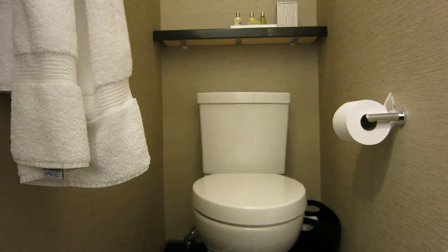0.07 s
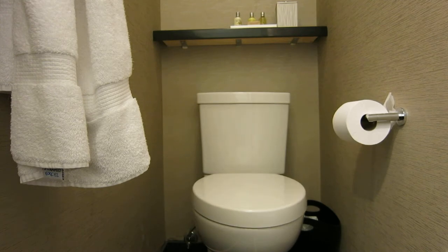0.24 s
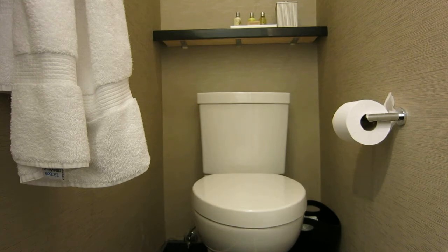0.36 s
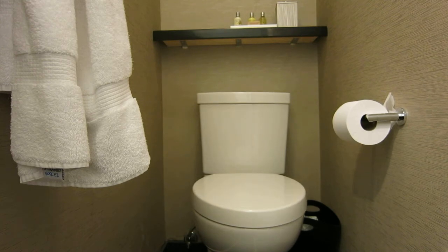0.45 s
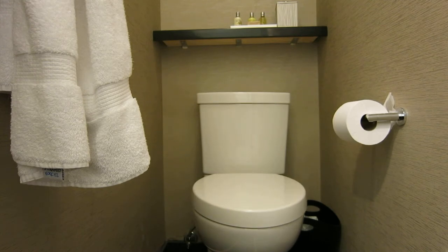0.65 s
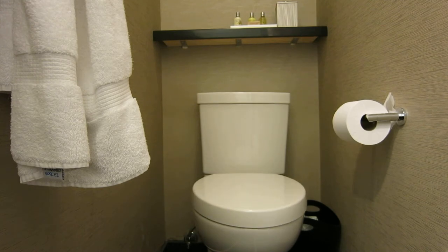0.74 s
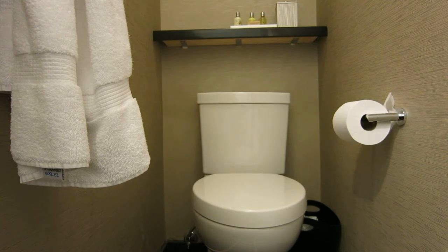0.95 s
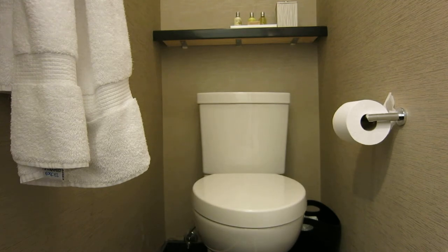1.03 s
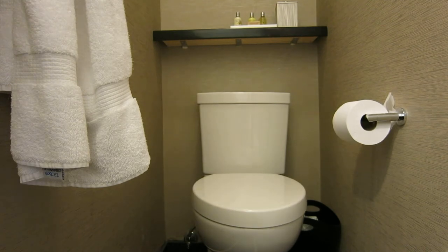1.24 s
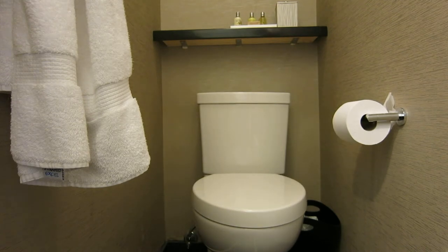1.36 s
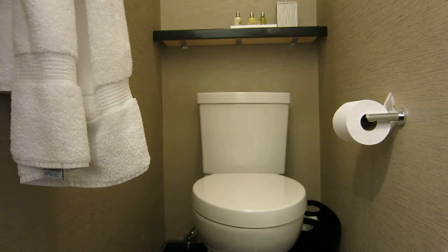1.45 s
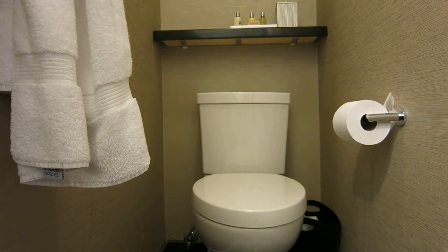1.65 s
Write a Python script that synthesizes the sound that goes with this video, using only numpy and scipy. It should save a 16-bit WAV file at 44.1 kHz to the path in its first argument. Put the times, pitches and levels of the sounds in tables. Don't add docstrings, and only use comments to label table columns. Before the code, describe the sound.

Toilet lid bangs onto its seat, bounces once and settles, over a steady low extractor fan

```python
import sys
import numpy as np
from scipy import signal
from scipy.fft import rfft, irfft, next_fast_len
from scipy.io import wavfile
from scipy.ndimage import map_coordinates

SR = 44100
rng = np.random.default_rng(int(sys.argv[2]) if len(sys.argv) > 2 else 0)


def voltage_ratio(decibels):
    exponent = np.asarray(decibels, float) / 20
    return 10 ** exponent


def materialize(psi):
    bounded = np.clip(np.atleast_2d(psi).T, -1, 1)
    quanta = np.round(bounded * 32767).astype(np.int16)
    wavfile.write(sys.argv[1], SR, quanta)


N = 74970

# centre in Hz, width in Hz, level in dB rms.
DUCT_MODES = [(75.6, 31, -49), (118, 6, -47), (224.8, 20, -54), (248.5, 4.7, -50.5), (278.5, 9.6, -49),
              (313.7, 36, -49), (406.3, 10, -57), (529.3, 40, -51.5)]
# centre in Hz, width in Hz, level in dB rms.
GRILLE_WHISTLE = (1955, 200, -61.5)
# frequency in Hz, level in dB per Hz.
AIR_SPECTRUM = [(25, -27.5), (48, -29), (130, -5.5), (300, -15), (370, -17), (600, -13), (1300, -20),
                (2700, -34)]
# frequency in Hz, left-right likeness from -1 to 1.
AIR_LIKENESS = [(60, .1), (130, -0.34), (290, 0.35), (640, -0.24), (1410, -0.24), (3000, 0.097)]
# time in seconds, level in dB.
VALVE_FLOW = [(0, -47.5), (.015, -63), (.3, -63), (.5, -65.5), (.8, -59.5), (1, -57), (1.2, -57),
              (1.5, -52), (1.7, -54.5)]
# frequency in Hz, level in dB per Hz.
VALVE_SPECTRUM = [(2000, -3), (3500, -5.5), (5000, -3), (8000, -1.5), (11500, 0), (13500, -2.5),
                  (15500, -10)]
# frequency in Hz, left-right likeness from -1 to 1.
VALVE_LIKENESS = [(3000, 1), (5000, 1), (9000, 0.65), (14000, .0)]
# centre in Hz, width in Hz, level in dB rms.
SQUEAK_BANDS = [(1950, 250, -55), (5200, 1700, -61)]
# time in seconds, length in seconds, level in dB.
CLOTH_RUSTLES = [
    (0.99, .04, -52),
    (1.12, .03, -55),
]
# frequency in Hz, level in dB per Hz.
CLOTH_SPECTRUM = [(200, -40), (500, -1.5), (1000, -10), (1800, 11.5), (2600, -1), (4000, -30.5)]
# start in seconds, clack level in dB, tick level in dB.
CONTACTS = [
    (0.2014, -18, -34),
    (0.2693, -17.5, -36),
    (0.361, -44, -60),
]
# frequency in Hz, push by the front contact, push by the hinge side,
# decay time t60 in seconds.
BOWL_MODES = [(114, .02, .025, .4), (183.4, .31, .08, .55), (200, .75, .29, .33), (207.8, 1.76, -.54, .27),
              (226, -1.63, .74, .16), (253, .14, -.11, .3), (219, .04, .04, .7), (330, .06, .05, .35)]
LID_MODES_HZ = [408, 469, 596, 644, 692, 780, 840, 962, 992, 1042, 1100, 1372, 1685, 2040]
# level from the front in dB, level from the hinge side in dB,
# decay time t60 in seconds.
LID_MODES = [(-1.5, 0, 0.07), (10, -1.5, 0.047), (-2, -16, 0.47), (5.5, 0, 0.093), (-8, -11, 0.098),
             (-11.5, -13.5, 0.11), (-1.5, -7, 0.34), (-3.5, -1, .1), (-4.5, -3.5, 0.26), (-14.5, -14, 0.12),
             (-24.5, -16, 0.083), (3, -5.5, 0.15), (-6, -6, 0.13), (-10.5, -18.5, 0.23)]
# frequency in Hz, phase offset of either port in radians.
LID_PHASE = [(400, .15), (900, .3), (1370, .9), (2500, .5)]
# frequency in Hz, level in dB per Hz.
KNOCK_SPECTRUM = [(220, -4.5), (330, -6), (430, 1), (700, 1), (1500, -3.5), (2800, -14.5), (3200, -30),
                  (5000, -40.5)]
# frequency in Hz, level in dB per Hz.
TICK_SPECTRUM = [(1500, -22.5), (3000, 3.5), (4200, -3.5), (4800, -14), (9000, -21), (12000, -34)]
# frequency in Hz, decay time t60 in seconds.
WALL_DECAY = [(200, 0.39), (600, 0.31), (1500, 0.26), (3000, 0.17), (8000, 0.033)]
# frequency in Hz, level in dB per Hz.
SELF_NOISE_SPECTRUM = [(1000, -41), (3000, -4), (8000, -6), (15000, -15.5)]


def unit(x):
    return x / np.sqrt(np.mean(x ** 2) + 1e-20)


def along(points, hz):
    f, value = np.transpose(points)
    return np.interp(np.log(hz + 1), np.log(f + 1), value)


def spectrum(points):
    return lambda hz: voltage_ratio(along(points, hz))


def wobble(rate):
    return map_coordinates(rng.standard_normal(200), [np.arange(N) * rate / SR])


def noise(gain, alike, size=N):
    m = next_fast_len(size + 8192)
    hz = np.fft.rfftfreq(m, 1 / SR)
    turn = np.arccos(np.clip(along(alike, hz), -1, 1)) / 2
    bins = rfft(rng.standard_normal((2, m))) * gain(hz)
    mid, side = irfft(bins * [np.cos(turn), np.sin(turn)], m)[:, :size]
    return unit(np.array([mid + side, mid - side]))


def peak(centre_hz, width_hz):
    return lambda f: 1 / (1 + ((f - centre_hz) / (width_hz / 2)) ** 2)


def fan():
    hum_hz = 151.1 + 0.26 * wobble(9.5)
    hum_db = -41.5 + 1.5 * wobble(14.44)
    phase = 2 * np.pi * np.cumsum(hum_hz) / SR
    hum = np.sqrt(2) * voltage_ratio(hum_db) * np.sin(phase + [[.25], [-.25]])
    duct = sum(voltage_ratio(db) * noise(peak(hz, width), AIR_LIKENESS)
               for hz, width, db in DUCT_MODES + [GRILLE_WHISTLE])
    air_db = -41 + .5 * (wobble(9) + wobble(16.3))
    fading_treble = [(3200, -45), (6000, -47.5), (9000, -120)]
    air = voltage_ratio(air_db) * noise(spectrum(AIR_SPECTRUM + fading_treble), AIR_LIKENESS)
    return hum + duct + air


def valve():
    t = np.arange(N) / SR
    brightens = 1
    squeak_s, squeak_length_s = 1.115, .025
    flow_db = np.interp(t, *np.transpose(VALVE_FLOW)) + .5 * wobble(3.7)
    colour = spectrum([(1000, -120)] + VALVE_SPECTRUM)

    def treble_share(f):
        return 1 / (1 + (7000 / (f + 1)) ** 4)

    low_db = flow_db - 4 - brightens * (flow_db + 59.5) / 2
    low = noise(lambda f: colour(f) * (1 - treble_share(f)), VALVE_LIKENESS) * voltage_ratio(low_db)
    high = noise(lambda f: colour(f) * treble_share(f), VALVE_LIKENESS) * voltage_ratio(flow_db - 5.5)
    squeak = sum(voltage_ratio(db) * noise(peak(hz, width), [(1, 1.0)]) for hz, width, db in SQUEAK_BANDS)
    squeak = squeak * np.exp(-((t - squeak_s) / squeak_length_s) ** 2)
    return low + high * voltage_ratio([[.6], [-.6]]) + squeak


def cloth():
    t = np.arange(N) / SR
    swell = sum(voltage_ratio(db) * np.exp(-((t - s) / length) ** 2) for s, length, db in CLOTH_RUSTLES)
    return swell * voltage_ratio(3 * wobble(90)) * noise(spectrum(CLOTH_SPECTRUM), [(1, .5)])


def boom():
    side_db, rise_s = -21, .0166
    out = np.zeros((2, N))
    for k, (start_s, *_) in enumerate(CONTACTS[:2]):
        t = np.clip(np.arange(N) / SR - start_s, 0, None)
        for j, (hz, *push, t60) in enumerate(BOWL_MODES):
            turn = voltage_ratio(side_db) * (-1) ** j * np.array([[1], [-1]])
            envelope = voltage_ratio(-60 * t / t60) * (1 - np.exp(-t / rise_s))
            out += push[k] * envelope * np.sin(2 * np.pi * hz * t + turn)
    return out


def walls(x):
    diffuse = noise(np.ones_like, [(1, .6)], size=SR // 2)
    hz, t, bins = signal.stft(diffuse, SR, nperseg=256)
    decay = voltage_ratio(-60 * t / along(WALL_DECAY, hz)[:, None])
    tail = signal.istft(bins * decay, SR, nperseg=256)[1]
    delayed = np.pad(x, ((0, 0), (150, 0)))
    return signal.fftconvolve(delayed, tail / np.linalg.norm(tail[0]), axes=1)[:, :x.shape[1]]


def lid_ring(side, t):
    rise_s = .005
    ports = np.array([[1], [-1]])
    ring = 0
    for hz, (*level_db, t60) in zip(LID_MODES_HZ, LID_MODES):
        cycles = hz * t + rng.random()
        offset = ports * along(LID_PHASE, hz) * rng.choice([-1, 1])
        ring = ring + voltage_ratio(level_db[side] - 60 * t / t60) * np.sin(2 * np.pi * cycles + offset)
    return (1 - np.exp(-t / rise_s)) * ring


def lid_knock(t):
    level_db, t60, rise_s = 3.5, .018, 0.0027
    knock = noise(spectrum(KNOCK_SPECTRUM + [(13000, -54.5)]), [(1, 0.92)], size=len(t))
    return knock * voltage_ratio(level_db - 60 * t / t60) * (1 - np.exp(-(t / rise_s) ** 2))


def lid_tick(tick_db, t):
    t60, rise_s = 0.021, 0.0016
    tick = noise(spectrum(TICK_SPECTRUM), [(1, 1.0)], size=len(t))
    return tick * voltage_ratio(tick_db - 60 * t / t60) * np.tanh(t / rise_s)


def lid():
    lead_s, clack_gain_db = 0.00093, 2
    knock_wet_db, ring_wet_db, tick_wet_db = 11.5, -15, -3
    out = np.zeros((2, N + SR))
    t = np.arange(SR // 2) / SR
    for k, (start_s, clack_db, tick_db) in enumerate(CONTACTS):
        ring = lid_ring(min(k, 1), t)
        knock = lid_knock(t)
        tick = lid_tick(tick_db, t)
        clack = ring + knock + walls(voltage_ratio(knock_wet_db) * knock + voltage_ratio(ring_wet_db) * ring)
        hit = voltage_ratio(clack_db + clack_gain_db) * clack + tick + voltage_ratio(tick_wet_db) * walls(tick)
        first = round((start_s - lead_s) * SR)
        out[:, first:first + len(t)] += hit
    return out[:, :N]


def scene():
    blow = boom() * voltage_ratio([[-.9], [.8]]) + lid() * voltage_ratio([[-.5], [.5]])
    return blow + fan() + valve() + cloth()


def top_cut(x):
    return signal.sosfilt(signal.butter(12, 15750, fs=SR, output="sos"), x)


def record(dry):
    duck_db, duck_in_s, duck_out_s = -16, .0174, .114
    after = np.clip(np.arange(N) / SR - CONTACTS[0][0], 0, None)
    duck = voltage_ratio(duck_db * (1 - np.exp(-after / duck_in_s)) * np.exp(-after / duck_out_s))
    hiss = voltage_ratio(-68.5) * noise(spectrum(SELF_NOISE_SPECTRUM), [(1, 0.54)])
    low_cut = signal.butter(2, 30, "high", fs=SR, output="sos")
    mix = signal.sosfiltfilt(low_cut, dry * duck) + hiss
    return top_cut(mix)


dry = scene()
out = record(dry)
materialize(out)
```